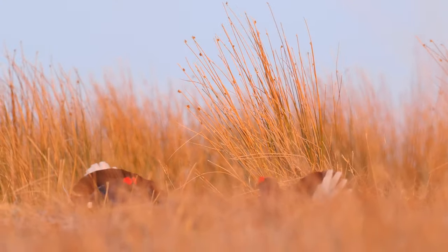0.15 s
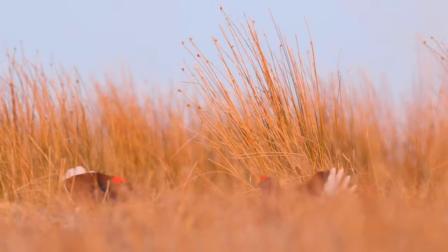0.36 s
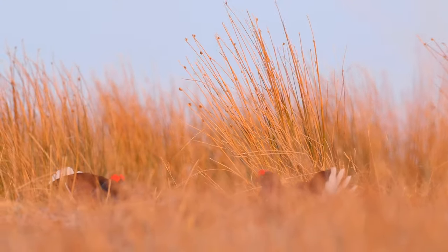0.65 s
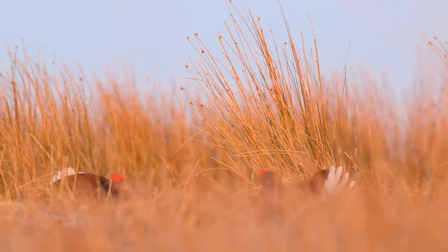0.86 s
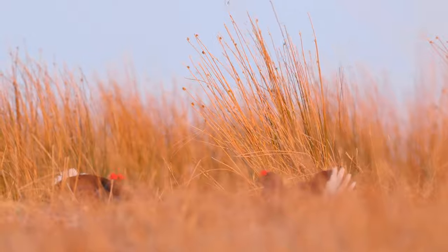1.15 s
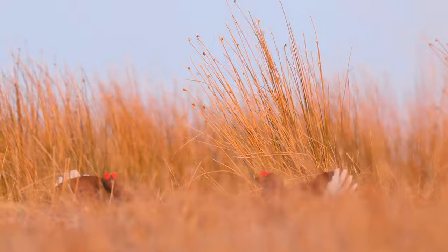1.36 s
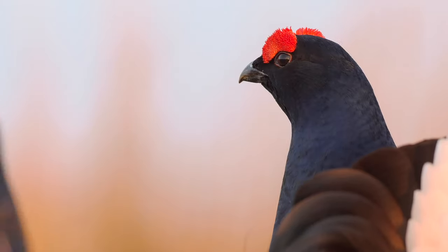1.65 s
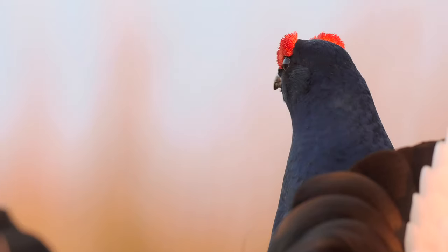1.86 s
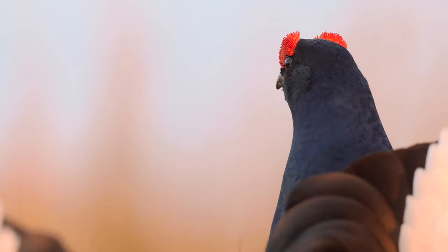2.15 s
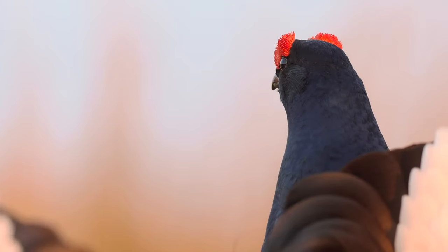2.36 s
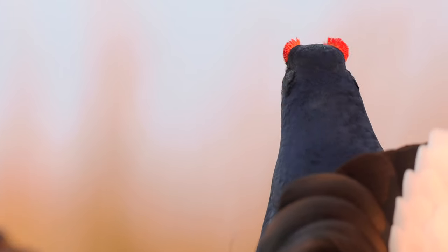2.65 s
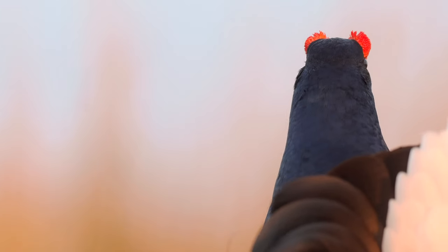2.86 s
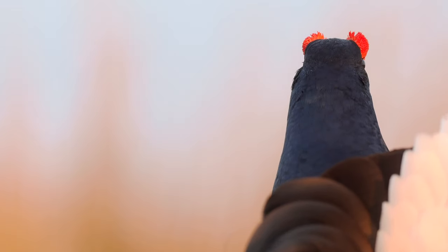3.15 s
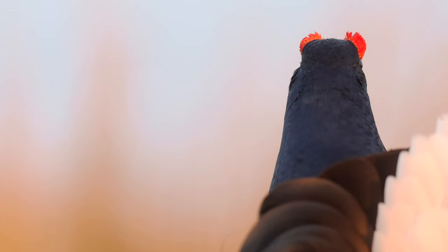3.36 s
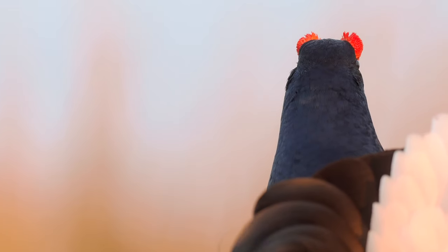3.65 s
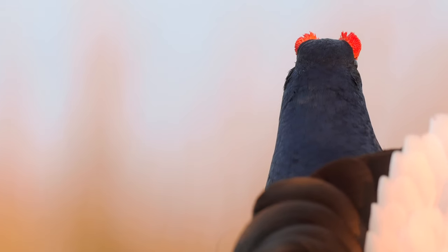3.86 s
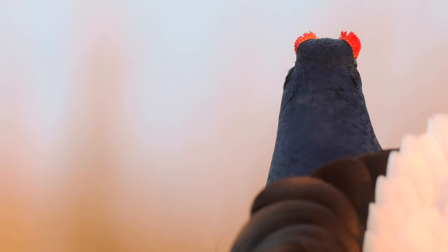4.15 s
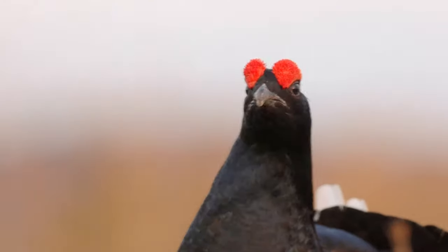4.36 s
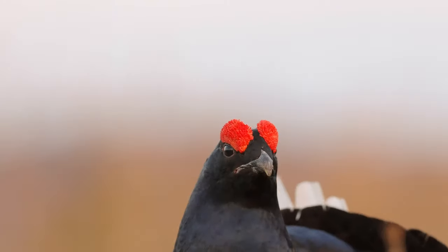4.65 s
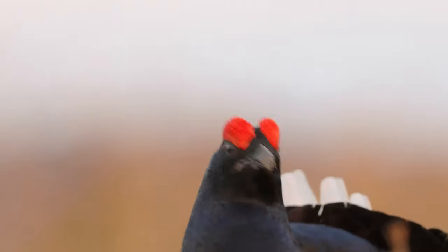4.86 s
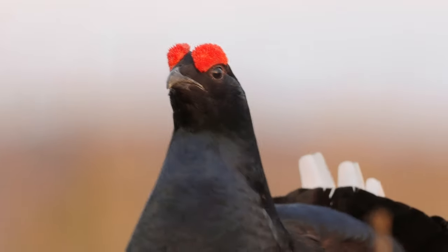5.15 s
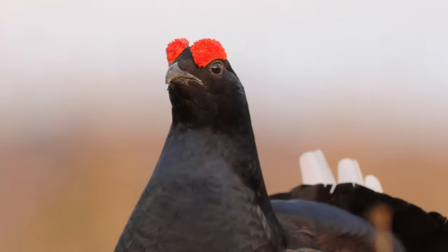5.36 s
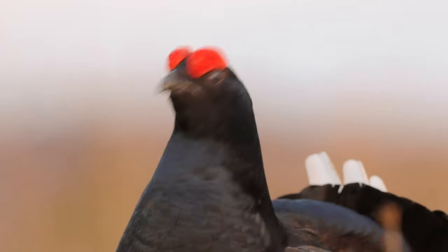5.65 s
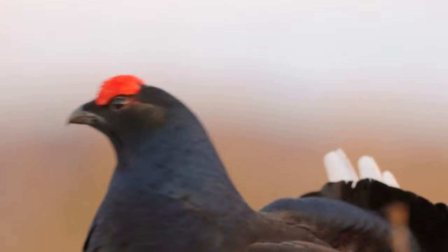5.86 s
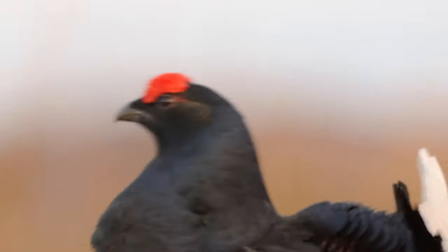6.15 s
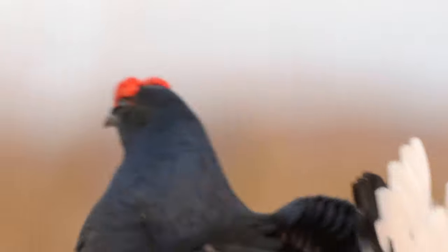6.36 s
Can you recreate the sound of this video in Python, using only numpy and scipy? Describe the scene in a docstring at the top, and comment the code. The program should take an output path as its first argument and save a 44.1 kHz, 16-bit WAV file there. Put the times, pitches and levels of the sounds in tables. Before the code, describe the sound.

Rolling, hollow grouse cooing near and steady on open moorland, with distant birds cooing and whistling, tiny high trills and soft airy hush.

```python
"""Black grouse bubble at a lek on open moorland: an opening, a rising roll and a flourish of short coos near 450 Hz.
Each coo is a nearly pure tone that falls in pitch; a hum filter notches the fall, so that it throbs. Further coos,
mostly lower and weaker, sound over and between these parts. Small birds trill and slide as frequency-modulated tones,
far birds whistle and coo as pure tones, and hoarse rasps are bands of noise with a rattle in their level.
Beneath lie the hush of the moor and the blurred cooing of the rest of the lek, both shaped from noise."""
import sys
import numpy as np
from scipy import signal
from scipy.fft import rfft, irfft, next_fast_len
from scipy.io import wavfile
from scipy.ndimage import uniform_filter1d, map_coordinates

SR = 44100
rng = np.random.default_rng(int(sys.argv[2]) if len(sys.argv) > 2 else 0)


def int16_out(signal):
    """Quantize to a 16-bit WAV file."""
    q = np.round(np.clip(np.atleast_2d(signal).T, -1, 1) * 32767)
    wavfile.write(sys.argv[1], SR, q.astype(np.int16))


N = 287091
TIME = np.arange(N) / SR


def amp(db):
    """Turns decibels into a linear gain."""
    return 10 ** (np.asarray(db) / 20)


def unit(x):
    """Scales a sound to an rms of 1."""
    return x / np.sqrt(np.mean(x ** 2) + 1e-20)


def read(points, hz):
    """Reads a curve given by points, on a log-frequency axis."""
    f, value = np.transpose(points)
    return np.interp(np.log(hz + 1), np.log(f + 1), value)


def sine(hz):
    """A tone that follows a moving pitch, its phase the running sum of the frequency."""
    return np.sin(2 * np.pi * np.cumsum(hz) / SR)


def add(mix, start_s, sound):
    """Lays a sound into the mix from its start, trimmed at both ends of the scene."""
    at = int(round(start_s * SR))
    sound = sound[max(-at, 0):]
    part = mix[max(at, 0):][:len(sound)]
    part += sound[:len(part)]


def band(size, hz, width_hz):
    """Noise of rms about 1 in one steep-sided resonance; centred on 0 Hz it is a slow random drift."""
    f = np.fft.rfftfreq(next_fast_len(size + 4096), 1 / SR)
    spectrum = rng.standard_normal(len(f)) + 1j * rng.standard_normal(len(f))
    resonance = 1 / (1 + (2 * (f - hz) / width_hz) ** 4)
    return unit(irfft(spectrum * resonance))[:size]


def song():
    """Coos in recurring parts, each placed with its own tempo, pitch and strength."""
    # three sinking coos: t/s into the part, level/dB, f/Hz, swell/s, fade/s
    opening = [(0.0, -24.5, 424, 0.0038, 0.013), (0.048, -30, 392, 0.003, 0.015),
               (0.116, -33.5, 386, 0.007, 0.017)]
    # about 15 coos a second that climb in pitch, slackening midway and quickening at the end:
    # t/s into the part, level/dB, f/Hz, swell/s, fade/s
    roll = [(0.0, -26.5, 425, 0.006, 0.018), (0.066, -27, 422, 0.0073, 0.016),
            (0.135, -28, 422, 0.009, 0.023), (0.204, -25.0, 428, 0.009, 0.017),
            (0.272, -24.0, 429, 0.0077, 0.016), (0.354, -23, 439, 0.022, 0.011),
            (0.433, -21.0, 451, 0.022, 0.005), (0.502, -22, 472, 0.019, 0.008),
            (0.569, -23, 475, 0.014, 0.007), (0.627, -20.5, 478, 0.007, 0.0056),
            (0.683, -23.5, 477, 0.0096, 0.0061)]
    # a quick, uneven figure: t/s into the part, level/dB, f/Hz, swell/s, fade/s
    flourish = [(0.0, -22, 472, 0.014, 0.004), (0.097, -25.5, 472, 0.0048, 0.0035),
                (0.197, -24.0, 465, 0.0053, 0.0045), (0.245, -24, 475, 0.0083, 0.005),
                (0.289, -24.5, 443, 0.0098, 0.0083), (0.326, -24.0, 468, 0.011, 0.005),
                (0.369, -23.5, 461, 0.0066, 0.0084), (0.405, -27.5, 426, 0.011, 0.0093),
                (0.419, -29, 498, 0.013, 0.006), (0.5, -22, 460, 0.012, 0.012),
                (0.641, -23.5, 491, 0.01, 0.0073), (0.665, -24, 486, 0.015, 0.0094),
                (0.701, -26.5, 461, 0.0034, 0.0035), (0.74, -23.0, 458, 0.0044, 0.006),
                (0.811, -27, 485, 0.0045, 0.0042), (0.869, -39, 508, 0.009, 0.0071),
                (0.916, -23.5, 499, 0.0064, 0.0044), (0.958, -24, 479, 0.0062, 0.0059),
                (0.984, -24, 477, 0.0042, 0.0055), (1.059, -21.5, 469, 0.011, 0.0057)]
    # the order of the parts; some rolls use only their first coos:
    # part, number of coos, start t/s, time stretch [factor], pitch [factor], gain/dB
    part_order = [("flourish", 20, -.17, 1.016, 0.97, -8.5), ("opening", 3, 1.123, 1.226, 1.075, -.5),
                  ("roll", 2, 1.327, .926, .94, -2.5), ("roll", 11, 1.515, 1, 1, 0),
                  ("flourish", 20, 2.49, 1, 1, 0), ("opening", 3, 3.779, 0.99, 1.04, 0.46),
                  ("roll", 5, 3.961, 0.98, 1.005, -1.85), ("flourish", 20, 4.516, 1.02, 0.99, 0.61),
                  ("opening", 3, 5.819, 1.046, 1.01, -1.3), ("roll", 5, 6.065, 1, 0.97, -3.5)]
    # each part with the sweep of its coos above and below their pitch, in Hz
    parts = {"opening": (opening, 99.9), "roll": (roll, 78.1), "flourish": (flourish, 56)}
    coos = []
    for part, count, start_s, stretch, pitch, gain_db in part_order:
        rows, fall_hz = parts[part]
        for s, db, hz, swell_s, fade_s in rows[:count]:
            coos.append((start_s + stretch * s, db + gain_db, hz * pitch, swell_s, fade_s, fall_hz))
    return coos


def further_coos(fall_hz=50.02):
    """Further coos, mostly lower and weaker, over and between the song parts; they fall less far."""
    # t/s, level/dB, f/Hz, swell/s, fade/s
    more_coos = [(.198, -32, 385.7, 0.013, 0.011), (.214, -26, 412, 0.0083, 0.0085),
                 (.256, -28.5, 430.8, 0.008, .022), (.334, -23.5, 414.2, .01, 0.0055),
                 (.379, -33, 403, 0.013, 0.017), (.438, -34, 397.4, 0.011, 0.013),
                 (.672, -31, 425.6, 0.013, .017), (.721, -27, 420, 0.011, 0.012),
                 (.802, -27.5, 395, .007, 0.0048), (.848, -32.5, 404, 0.0087, 0.024),
                 (1.136, -26.5, 440, 0.0051, 0.014), (1.188, -29, 425, .007, .012),
                 (1.252, -30, 402, .015, .008), (2.443, -39, 485, .004, .004),
                 (4.478, -34.5, 465, 0.0092, 0.0046), (4.593, -34, 400, .012, 0.011),
                 (4.668, -34.5, 455, 0.022, 0.017), (4.975, -39, 508, .015, .025),
                 (5.13, -34, 405, 0.016, 0.013), (5.232, -29, 450, .004, .005),
                 (5.25, -35, 404, .008, .019), (5.293, -33.5, 409, 0.032, .014),
                 (5.333, -38.5, 550, .008, .008), (5.352, -33.5, 400, .015, 0.013),
                 (5.404, -33.5, 535, 0.0094, 0.0083), (5.742, -37.5, 440, 0.013, 0.015),
                 (5.821, -24.5, 430, 0.0032, .005), (6.089, -27.5, 398, 0.0131, 0.015),
                 (6.285, -30, 412, 0.0098, 0.0066), (6.43, -45, 405, 0.018, .04)]
    return [(*row, fall_hz) for row in more_coos]


def coo(coos):
    """Nearly pure bubbles from the swollen throat; each swells and fades while its pitch falls."""
    fall_s, waver = 0.02, 0.0055  # time scale of the fall; random pitch drift, rms fraction
    lead_in, shoulder, shoulder_length = 0.06, 0.11, 2.1  # share of slow skirt before and after the peak
    octave_db, flutter_db = -47, -37
    gulp_db, gulp_s, gulp_delay_s = -22, 0.011, 0.0049
    gulp_pitch, gulp_fall = 0.7, 0.2  # fractions of the coo's pitch
    out = np.zeros(N)
    t = np.arange(-SR // 10, SR // 10) / SR
    window = signal.windows.tukey(len(t), .5)
    for s, db, hz, swell_s, fade_s, fall_hz in coos:
        phase, angle = rng.random(2)
        u = t / np.where(t < 0, swell_s, fade_s)
        skirt = np.where(t < 0, lead_in, shoulder)  # a clean start and a soft trail
        swell = (1 - skirt) * np.exp(-u ** 2) + skirt * np.exp(-abs(u) / shoulder_length)
        pitch_hz = hz * (1 + waver * band(len(t), 0, 380)) - fall_hz * np.tanh(t / fall_s)
        tone = swell * np.cos(2 * np.pi * (np.cumsum(pitch_hz) / SR + phase))
        # as the bubble closes, a weak gulp skids below its pitch
        v = 2 * (t - gulp_delay_s) / gulp_s
        skid = np.cumsum(hz * (gulp_pitch - gulp_fall * np.tanh(v / 2))) / SR
        gulp = amp(gulp_db) * np.exp(-v ** 2 / 2) * np.cos(2 * np.pi * (skid + angle))
        add(out, s + t[0], amp(db) * (tone + gulp) * window)
    wave = signal.hilbert(out, next_fast_len(N))[:N]
    octave = (wave ** 2).real / (abs(wave) + 1e-6)  # squaring doubles the pitch
    flutter = uniform_filter1d(abs(wave), 700) * band(N, 196, 150)  # a soft, low puff under each bubble
    return out + amp(octave_db) * octave + amp(flutter_db) * flutter


def murmur(near, follow_db=-22, far_db=-63):
    """Noise at coo pitch: one band fills and trails the near runs, the other is the rest of the lek."""
    keep = np.exp(-1 / (0.017 * SR))
    run = np.sqrt(signal.lfilter([1 - keep], [1, -keep], near ** 2))  # rises with the coos and lingers
    trail = amp(follow_db) * run * band(N, 449, 150)
    lek = amp(far_db) * band(N, 409, 190)
    return (trail + lek) * background()


def slides():
    """Rows of a songbird's long falling notes."""
    # t/s, length/s, first f/Hz, last f/Hz, level/dB, trill depth/Hz
    falling_notes = [(1.488, 0.15, 4360, 3930, -58.5, 180), (1.895, 0.31, 4590, 3300, -62.5, 150),
                     (3.365, 0.26, 4230, 3580, -66, 130), (3.765, 0.14, 4510, 4130, -63.5, 42),
                     (4.285, 0.069, 4420, 3930, -59.5, 150), (4.535, .21, 4620, 3530, -59.5, 45),
                     (4.885, .19, 4660, 3573, -60.5, 55), (5.61, .11, 4403, 3928, -66.5, 169)]
    return falling_notes


def chips(length_s=0.0432, trill_depth_hz=135):
    """Rows of the songbird's short notes, which share one length and one trill depth."""
    # t/s, first f/Hz, glide/Hz, level/dB
    short_notes = [(.2, 3700, -40, -69), (.29, 3750, -60, -69), (1.447, 5240, -30, -66),
                   (1.704, 4940, -750, -52.5), (1.78, 4620, 580, -57), (1.822, 4890, -340, -55),
                   (2.3, 3420, -120, -67), (2.53, 4700, -40, -65), (2.63, 3350, 60, -68),
                   (2.878, 4560, 260, -58.5), (2.985, 4440, -150, -60.5), (3.162, 5000, -300, -59),
                   (3.243, 4700, 600, -58.5), (3.28, 4800, -120, -57), (3.988, 4790, -320, -56.5),
                   (4.51, 4250, 201, -60), (6.115, 4550, 210, -61.5), (6.172, 4480, -21.5, -64)]
    return [(s, length_s, hz, hz + glide_hz, db, trill_depth_hz) for s, hz, glide_hz, db in short_notes]


def twitter(count=110, db=-79, low_hz=3200, high_hz=4900):
    """Rows of faint chirps from far birds, strewn at random over the scene."""
    when, length, pitch, slide, depth = rng.random((count, 5)).T
    first_hz = low_hz + (high_hz - low_hz) * pitch
    last_hz = first_hz * (1 - 0.11 * slide)
    length_s = 0.026 + 0.088 * length
    return np.transpose([when * N / SR, length_s, first_hz, last_hz, np.full(count, db), 90 * depth])


def songbirds(rows, trill_hz=100, unsteady=.35, flicker=0.46, fade_db=-3):
    """Sliding notes, buzzed by a fast and uneven trill in pitch while their level flickers."""
    out = np.zeros(N)
    for s, length_s, first_hz, last_hz, db, depth_hz in rows:
        size = int(length_s * SR)
        u = np.linspace(0, 1, size)
        trill = sine(trill_hz * (1 + unsteady * band(size, 0, 120)))
        hz = last_hz + (first_hz - last_hz) * (1 - u) ** 1.3 + depth_hz * trill
        level = amp(db + fade_db * (u - .5)) * signal.windows.tukey(size, .35)
        level = level * (1 + flicker * band(size, 0, 290))
        add(out, s, level * sine(hz))
    return out


def far_notes(slur=0.43, waver=0.0048, edges_s=0.031):
    """Whistles and coos of far birds: pure tones that slur into a held pitch."""
    # t/s, length/s, first f/Hz, held f/Hz, level/dB
    clear_notes = [(0.143, 0.046, 1290, 1420, -64), (0.633, 0.15, 620, 594, -52),
                   (4.33, 0.053, 574, 540, -52.5), (4.349, 0.12, 1020, 1120, -70),
                   (4.873, 0.044, 796, 842, -52), (5.394, 0.044, 823, 780, -47.5),
                   (5.484, 0.069, 840, 816.7, -56), (5.565, 0.037, 800, 800, -53),
                   (5.62, .368, 1295, 1511, -58), (6.045, 0.083, 1280, 1590, -64),
                   (6.127, .07, 2090, 2147, -66), (6.235, .06, 2110, 2125, -68),
                   (3.529, 0.16, 4850, 4780, -76), (5.95, .14, 5050, 4962, -74),
                   (6.36, 0.036, 1180, 1486, -59), (6.389, 0.12, 2195, 2243, -59)]
    out = np.zeros(N)
    for s, length_s, first_hz, held_hz, db in clear_notes:
        size = int(length_s * SR)
        t = np.arange(size) / SR
        rest = np.clip(1 - t / (slur * length_s + 0.018), 0, 1) ** 1.6  # share of the slur still to go
        hz = (held_hz + (first_hz - held_hz) * rest) * (1 + waver * band(size, 0, 150))
        add(out, s, amp(db) * signal.windows.tukey(size, edges_s / length_s) * sine(hz))
    return out


def rasps(rattle_hz=70, rattle=0.15, widen=1.63):
    """Air forced through a narrow throat, rattling as it goes."""
    # t/s, length/s, centre f/Hz, width/Hz before widening, level/dB
    hoarse_calls = [(0.035, 0.16, 1340, 108.5, -74), (0.776, 0.042, 3580, 1410, -61.5),
                    (1.673, .22, 1590, 80, -68.5), (3.149, .25, 1520, 320, -72),
                    (4.848, 0.057, 2020, 198, -65.5), (4.924, 0.061, 1830, 221.3, -59.5),
                    (4.942, 0.047, 2880, 1300, -63), (4.979, 0.13, 1542, 220, -65.5),
                    (5.185, 0.14, 1898, 350, -67.5), (6.463, 0.061, 1900, 150, -56)]
    out = np.zeros(N)
    for s, length_s, hz, width_hz, db in hoarse_calls:
        size = int(length_s * SR)
        throb = 1 + rattle * np.sin(2 * np.pi * rattle_hz * np.arange(size) / SR)
        air = band(size, hz, width_hz * widen)
        add(out, s, amp(db) * signal.windows.tukey(size, .5) * throb * air)
    return out


def place(x, right_db, lag):
    """Sets a source between the ears: louder on the right by right_db, later there by lag samples."""
    late = map_coordinates(x, [np.arange(N) - lag], order=3)
    return np.array([x * amp(-right_db / 2), late * amp(right_db / 2)])


def moor(x, t60):
    """Weak scatter from tussocks and rushes: a noise tail that differs in each ear and dies in t60 seconds."""
    t = np.arange(SR // 2) / SR
    tail = rng.standard_normal((2, len(t))) * amp(-60 * t / t60) * (1 - np.exp(-t / 0.047))
    return signal.fftconvolve(x[None], tail / np.linalg.norm(tail[0]), axes=1)[:, :N]


def hush(air_db=-59):
    """Wide air over the moor, with a low rumble common to both ears; the background level moves both."""
    # colour of the air: f/Hz, relative level/dB
    colour = [(25, -77.5), (90, -74.5), (250, -69.5), (450, -73), (700, -74), (1000, -81.5), (2000, -85),
              (4000, -88.5), (6000, -92), (10000, -96.5), (15500, -102.5)]
    # left-right likeness of the air: f/Hz, likeness [0-1]
    likeness = [(50, .9), (180, 0.48), (700, 0.21), (8000, 0)]
    # rumble before the background level: t/s, level/dB
    rumble_level = [(0, -77), (1.45, -86), (1.7, -71.5), (3.6, -69.5), (6.5, -70.5)]
    hz = np.fft.rfftfreq(N, 1 / SR)
    left, other = rfft(rng.standard_normal((2, N)))
    same = read(likeness, hz)
    right = same * left + np.sqrt(1 - same ** 2) * other
    air = unit(irfft(np.array([left, right]) * amp(read(colour, hz)), N))
    rumble = amp(np.interp(TIME, *np.transpose(rumble_level))) * band(N, 42, 38)
    return (amp(air_db) * air + rumble) * background()


def background():
    """The moving gain of the hush, murmur and twitter, which dips briefly twice."""
    # t/s, gain/dB
    gain_points = [(0, 1.5), (1.435, 1.5), (1.441, -5), (1.53, -2.5), (1.68, 4), (2.6, 3), (4.272, 2),
                   (4.28, -1), (4.42, 3), (5, 4), (6.5, 1.5)]
    return amp(np.interp(TIME, *np.transpose(gain_points)))


def scene():
    """Sets the grouse, songbirds and far calls in the moor's scatter, over the hush."""
    near = coo(song() + further_coos())
    high = songbirds(slides()) + songbirds(chips()) + songbirds(twitter()) * background()
    far = far_notes() + rasps()
    grouse = place(near + murmur(near), right_db=5.0, lag=-.4) + amp(-17.5) * moor(near, t60=0.16)
    birds = place(high, right_db=5, lag=1.77) + amp(-12.5) * moor(high, t60=0.31)
    others = place(far, right_db=1.0, lag=0) + amp(-15.5) * moor(far, t60=0.25)
    return grouse + birds + others + hush()


def dips():
    """A gain on everything that drops at once, twice, and recovers exponentially."""
    # t/s, depth/dB, recovery/s
    drops = [(1.438, -45, 0.01), (4.274, -11, 0.047)]
    gain_db = np.zeros(N)
    for s, depth_db, recovery_s in drops:
        gain_db += depth_db * (TIME > s) * np.exp(-abs(TIME - s) / recovery_s)
    return amp(gain_db)


def record(dry, notch=0.94, ring=0.52, hum_hz=60, edge_hz=15720):
    """A hum filter notches every multiple of hum_hz, so falling coos throb; then two dips and a treble limit."""
    size = next_fast_len(N + SR // 2)
    delay = np.exp(-2j * np.pi * np.fft.rfftfreq(size, 1 / SR) / hum_hz)  # one hum period
    comb = (1 - notch * delay) / (1 - ring * delay)
    dehummed = irfft(rfft(dry, size) * comb, size)[:, :N]
    lowpass = signal.firwin(1023, edge_hz, window=("kaiser", 9), fs=SR)
    return signal.oaconvolve(dehummed * dips(), lowpass[None], "same")


dry = scene()
out = record(dry)
int16_out(out)
```